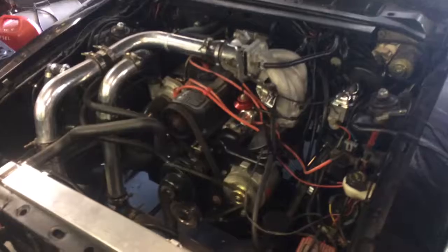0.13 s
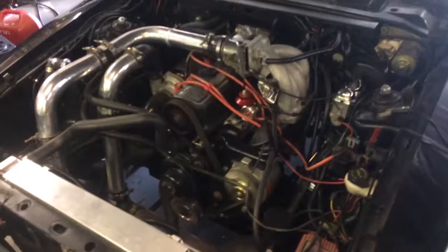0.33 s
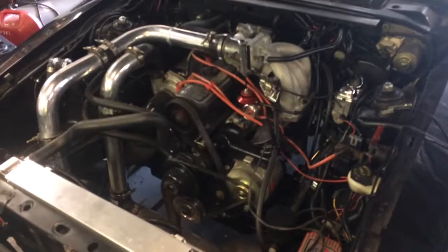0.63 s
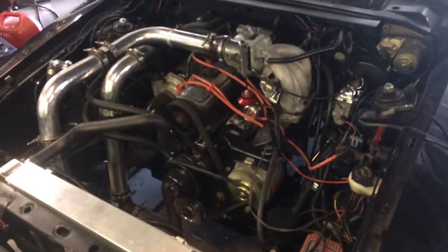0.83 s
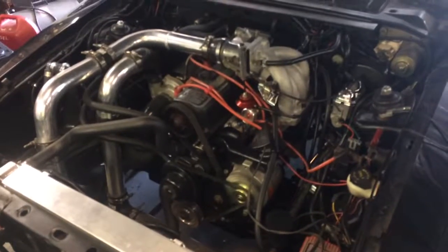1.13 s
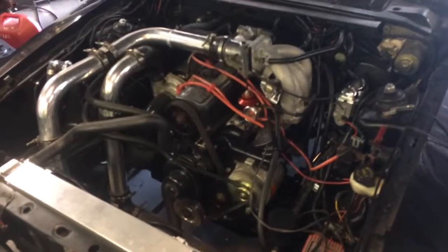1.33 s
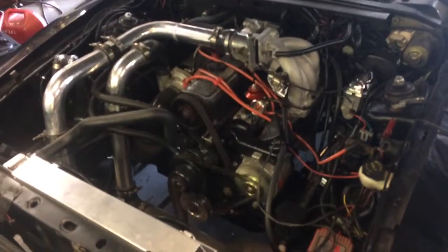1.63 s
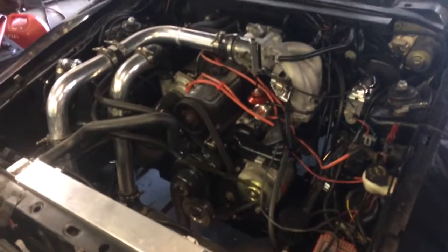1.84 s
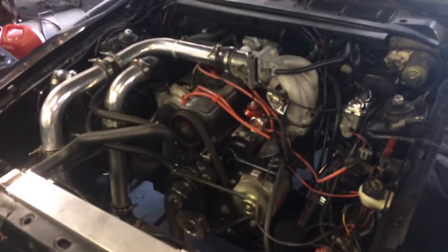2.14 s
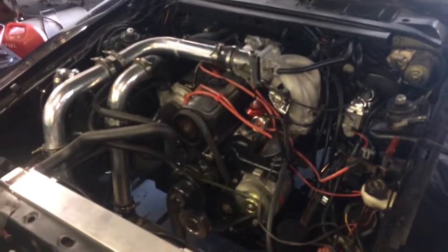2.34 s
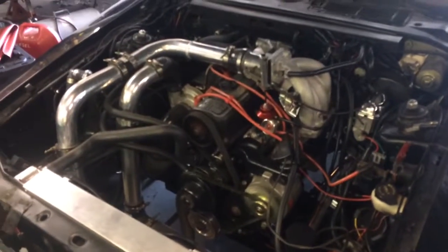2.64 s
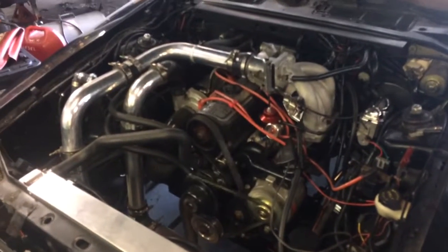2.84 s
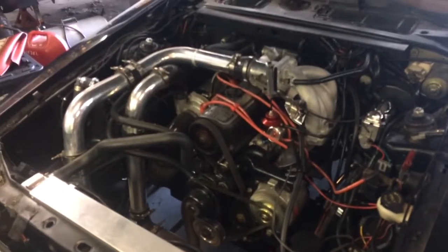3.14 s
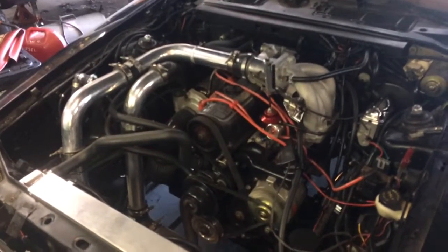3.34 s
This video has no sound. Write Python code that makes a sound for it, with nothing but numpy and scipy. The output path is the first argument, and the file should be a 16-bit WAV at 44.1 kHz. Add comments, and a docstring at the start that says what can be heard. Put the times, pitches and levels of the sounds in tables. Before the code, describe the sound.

A car engine idles unevenly with a deep boomy rumble, ticking valves and metallic clatter.

```python
"""A six-cylinder petrol engine settles from a fast idle and runs unevenly, heard over the open engine bay.
Uneven firing pulses excite resonances of the exhaust, and its boom drops out at each stumble.
Filtered random contacts make the valves tick and the block clatter and ring; loose parts rattle briefly.
Behind them lie the airy rush of intake and belts, a fluttering belt whine, flares of ringing metal,
a deep rumble of filtered noise and a low sine throb."""
import sys
import numpy as np
from scipy.fft import rfft, irfft, next_fast_len
from scipy.io import wavfile
from scipy.ndimage import map_coordinates

SR = 44100
rng = np.random.default_rng(int(sys.argv[2]) if len(sys.argv) > 2 else 0)


def master(y):
    """Save y as 16-bit WAV."""
    cut = np.clip(np.atleast_2d(y).T, -1, 1)
    pcm = np.round(cut * 32767)  # scale
    wavfile.write(sys.argv[1], SR, pcm.astype(np.int16))


N = 153027  # length in samples
SECONDS = np.arange(N) / SR


def amp(db):
    """Decibels as an amplitude factor."""
    return 10 ** (np.asarray(db) / 20)


def unit(x):
    """x scaled to rms 1."""
    return x / np.sqrt(np.mean(x ** 2) + 1e-20)


def curve(rows):
    """(time [s], value) rows as one value per sample."""
    return np.interp(SECONDS, *np.transpose(rows))


def wobble(rate):
    """A smooth random curve with rate knots a second."""
    knots = rng.standard_normal(400)
    return map_coordinates(knots, [SECONDS * rate], mode="wrap")


def filtered(x, response):
    """x through a filter given as a (complex) function of frequency in Hz."""
    size = 2 * next_fast_len(N)
    spectrum = rfft(x, size) * response(np.fft.rfftfreq(size, 1 / SR))
    return irfft(spectrum, size)[:N]


def coloured(x, points):
    """x through a causal filter with the given (frequency [Hz], level [dB]) shape, at rms 1."""
    hz, db = np.transpose(points)

    def response(f):
        magnitude = amp(np.interp(np.log(f + 1), np.log(hz), db))
        # Folding the cepstrum onto positive times gives minimum phase.
        cepstrum = irfft(np.log(magnitude))
        half = len(cepstrum) // 2
        cepstrum[1:half] *= 2
        cepstrum[half:] = 0
        return np.exp(rfft(cepstrum))
    return unit(filtered(x, response))


def resonate(x, modes, order=1):
    """x through parallel (frequency [Hz], width [Hz], level [dB]) resonances to a power, at rms 1."""
    def response(f):
        total = 0
        for k, (centre, width, db) in enumerate(modes):
            damping = 1j * f * width
            resonance = damping / (centre * centre - f * f + damping)
            total = total + (-1) ** k * amp(db) * resonance ** order  # neighbours alternate in sign
        return total
    return unit(filtered(x, response))


def bell(offset, half):
    """A smooth bump that falls to 1/e at the half length."""
    return np.exp(-(offset / half) ** 2)


def swells(rows):
    """Gain over time of short (time [s], half length [s], level [dB]) swells."""
    return sum(amp(db) * bell(SECONDS - time, half) for time, half, db in rows)


def per_cycle(cycle, rows):
    """Gain at rms 1 that rises at fixed places of each engine cycle."""
    power = 1
    for place, half, db in rows:
        offset = (cycle - place + 0.5) % 1 - 0.5  # from the nearest such place, in cycles
        power = power + amp(db) ** 2 * bell(offset, half)
    return unit(np.sqrt(power))


def impacts(rate, spread_db, wash_db):
    """Tiny random contacts, rate a second on average, with a wash of noise at wash_db against them."""
    struck = rng.random(N) < rate / SR
    sign = rng.choice([-1, 1], N)
    strength = amp(spread_db * np.clip(rng.standard_normal(N), -2, 2))
    hits = unit(struck * sign * strength)
    return unit(hits + amp(wash_db) * rng.standard_normal(N))


def tone(turns, flutter):
    """A sine of rms 1 whose phase wanders randomly, flutter in radians."""
    return np.sqrt(2) * np.sin(2 * np.pi * turns + flutter * wobble(80))


def rumble():
    """Deep resonant noise beneath the engine, with a sine throb that rises in pitch and then fades."""
    # level of the deep rumble: (time [s], level [dB])
    rumble_level = [(.12, -42), (.65, -31), (1.1, -46), (2, -48), (2.25, -35), (2.6, -43), (3.47, -46)]
    # its resonance: (frequency [Hz], width [Hz], level [dB])
    rumble_ring = [(44.6, 63, 0)]
    # throb while the idle settles: (time [s], frequency [Hz], level [dB])
    throb_path = [(.25, 24.1, -37), (.68, 46.4, -33), (1.05, 65.6, -68)]
    path = np.array(throb_path)
    turns = np.cumsum(curve(path[:, :2])) / SR
    throb = amp(curve(path[:, [0, 2]])) * tone(turns, flutter=0.54)
    deep_noise = resonate(rng.standard_normal(N), rumble_ring, order=3)
    return throb + amp(curve(rumble_level)) * deep_noise


def whine(cycle):
    """A belt-driven rotor sings at a fixed multiple of the crank speed, fluttering in level and phase."""
    # whine level around which it flutters: (time [s], level [dB])
    whine_level = [(.12, -49), (.4, -42), (.6, -46.5), (.8, -51), (2.0, -49), (3.47, -52)]
    crank_turns = 2 * cycle
    level_db = curve(whine_level) + 2.5 * wobble(60)
    return amp(level_db) * tone(crank_turns * 45.5, flutter=0.85)  # 45.5 periods per crank turn


def loose_parts():
    """Brief dull rattles of dense contacts, and flares of ringing metal as fluttering sines."""
    # loose rattles: (time [s], half length [s], level [dB])
    rattle_swells = [(1.017, 0.023, -33.5), (1.29, 0.016, -36.5), (1.548, 0.012, -27), (1.617, 0.027, -31),
                     (2.07, 0.021, -34.5), (2.385, 0.019, -35.5), (2.64, 0.011, -33), (2.9, 0.024, -34),
                     (3.21, 0.026, -37.5), (3.445, 0.014, -57)]
    # tone of the rattles: (frequency [Hz], level [dB])
    rattle_tone = [(150, -20), (400, -1), (600, 1.5), (950, 2.5), (1500, -19), (3200, -12), (7000, -36)]
    # flares of ringing metal: (time [s], half length [s], level [dB], frequency [Hz])
    metal_flares = [(0.5, .025, -37.5, 1370), (1.101, 0.0074, -34, 1347), (1.116, 0.036, -45, 1150),
                    (2.021, 0.056, -35.5, 1363), (2.024, 0.039, -39.5, 2070), (2.424, .02, -35.5, 1520),
                    (3.204, 0.015, -30.5, 1345)]
    contacts = impacts(rate=990, spread_db=1.0, wash_db=5)
    sound = swells(rattle_swells) * coloured(contacts, rattle_tone)
    for time, half, db, hz in metal_flares:
        sound = sound + swells([(time, half, db)]) * tone(hz * SECONDS, flutter=1.3)
    return sound


def block(cycle):
    """Dense mechanical contacts, heavier at some crank angles, ring the block; air rushes around it."""
    # heavier knocks: (place in the cycle [0-1], half length [cycles], level over the wash [dB])
    knocks = [(.47, .05, -3), (.99, .04, -3), (.18, .035, -2.5), (.75, .03, -8)]
    # clatter level, shared by body and ring before their trims: (time [s], level [dB])
    clatter_level = [(0.13, -35), (0.72, -35.5), (0.76, -37), (1.22, -35.5), (1.81, -33), (2.1, -34.5),
                     (2.99, -35), (3.02, -32), (3.15, -34.5), (3.22, -34), (3.23, -35), (3.43, -35),
                     (3.47, -36.5)]
    # broad colour of the clatter: (frequency [Hz], level [dB])
    clatter_tone = [(100, -12.5), (300, 3.5), (480, -2), (650, 1.5), (900, -2.5), (1300, 2), (1800, -4.5),
                    (2600, -12.5), (3600, -16.5), (6000, -20.5), (15000, -78)]
    # ringing of the block and its pipes: (frequency [Hz], width [Hz], level [dB])
    block_ring = [(1009.5, 25, 5.5), (1132, 41, 0), (1363, 24, 6.5), (1525, 22, 0.5), (2114, 45, -2),
                  (2766, 290, -10.5), (3460, 86, -10.5)]
    # airy rush of the intake and belts: (time [s], level [dB])
    rush_level = [(.12, -44), (.45, -44.5), (.8, -50.5), (1.25, -40.5), (1.5, -58), (2.02, -39), (2.3, -44),
                  (3.47, -47.5)]
    # resonance of the rush: (frequency [Hz], width [Hz], level [dB])
    rush_ring = [(1966, 880, 0)]
    body_trim_db, ring_trim_db = -2, -5.5

    drive = per_cycle(cycle, knocks) * amp(1.0 * wobble(24.79))
    body = coloured(drive * impacts(rate=800, spread_db=1.5, wash_db=-1.0), clatter_tone)
    ring_drive = drive * amp(1.9 * wobble(30.04))
    ring = resonate(ring_drive * impacts(rate=600, spread_db=2.5, wash_db=-5), block_ring)
    clatter = amp(body_trim_db) * body + amp(ring_trim_db) * ring
    rush = resonate(impacts(rate=600, spread_db=2.5, wash_db=-1), rush_ring, order=2)
    return amp(curve(clatter_level)) * clatter + amp(curve(rush_level)) * rush


def valves(cycle):
    """A gritty hiss with a thin metallic ring; each valve closing adds a bright tick."""
    # valve closings: (place in the cycle [0-1], half length [cycles], level over the wash [dB])
    closings = [(0.73, 0.055, 0), (0.07, 0.04, -8), (0.18, .055, -8), (.6, .025, -9), (.93, .04, -12)]
    # ticking level, shared by hiss and snap before their trims: (time [s], level [dB])
    ticking_level = [(0.13, -40), (0.81, -42.5), (1.18, -40), (1.2, -38), (1.3, -40), (1.95, -39),
                     (2.6, -39.5), (3.12, -38.5), (3.18, -39.5), (3.47, -39.5)]
    # broad colour of the hiss: (frequency [Hz], level [dB])
    tick_tone = [(800, -38.5), (3000, 1), (4200, -1), (5500, -2), (7100, 0.5), (8500, 0.5), (10500, -0.5),
                 (12000, 0.5), (13000, -0.5), (14200, -4), (15300, -8)]
    # bright edge of each tick: (frequency [Hz], level [dB])
    snap_tone = [(2000, -32), (7000, -9.5), (10500, 0), (13500, -2), (15300, -1)]
    # thin ringing in the hiss: (time [s], level [dB])
    sizzle_level = [(0.13, -56), (0.86, -54), (1.0, -49), (1.71, -47), (2.51, -56), (3.16, -49),
                    (3.47, -52)]
    # its resonances: (frequency [Hz], width [Hz], level [dB])
    sizzle_ring = [(7050, 250, -4), (7670, 300, 2), (11950, 380, 0.5)]
    hiss_trim_db, snap_trim_db = 0.5, -6.5

    ticks = per_cycle(cycle + 0.012 * wobble(8.4), closings)  # the closings wander slightly in time
    hiss_gain = ticks * amp(0.77 * wobble(30.58))
    hiss = coloured(hiss_gain * impacts(rate=700, spread_db=0.5, wash_db=9.5), tick_tone)
    snap_gain = (ticks - ticks.min()) * amp(1.5 * wobble(20))  # no snap between the closings
    snap = coloured(snap_gain * impacts(rate=1600, spread_db=-1, wash_db=7), snap_tone)
    ticking = amp(hiss_trim_db) * hiss + amp(snap_trim_db) * snap
    sizzle = resonate(rng.standard_normal(N), sizzle_ring, order=2)
    return amp(curve(ticking_level)) * ticking + amp(curve(sizzle_level)) * sizzle


def firings(cycle, scatter):
    """One pulse per firing, uneven in strength and timing, less the band that the muffler cancels."""
    # cylinders in firing order: (mean strength [dB], mean lateness [firing intervals])
    cylinders = [(1.5, 0.056), (2.1, -0.065), (1.5, -0.06), (-0.2, 0.09), (1, -0.031), (4, -0.054)]
    # unevenness, steady at first, then lumpy: (time [s], share of the full scatter)
    unevenness = [(.12, 0.4), (.65, 0.5), (.95, 1), (2.1, .8), (3.47, 1.05)]
    full_scatter_db, full_jitter = 2.5, 0.06  # jitter in firing intervals
    notch_hz, notch_width_hz = 208, 21

    count = len(cylinders)
    firing = np.arange(int(cycle[-1] * count))
    strength_db, late = np.array(cylinders)[firing % count].T
    firing_clock = cycle * count
    share = np.interp(firing, firing_clock, curve(unevenness))
    chance = scatter[firing] * share[:, None]
    moment = firing + late + full_jitter * chance[:, 0]
    sample = np.interp(moment, firing_clock, np.arange(N)).astype(int)
    pulses = np.bincount(sample, amp(strength_db + full_scatter_db * chance[:, 1]), N)

    def notch(f):
        gap = notch_hz ** 2 - f * f
        return (gap / (gap + 1j * f * notch_width_hz)) ** 2
    return filtered(pulses, notch)


def exhaust(cycle):
    """Firings boom in the muffler and ring the pipe more steadily; stumbles cut boom, drone and blare."""
    # stumbles, where firings fail: (time [s], half length [s], depth in the boom [dB])
    stumbles = [(1.514, 0.01, 35), (1.619, .012, 11), (1.795, 0.015, 9), (2.32, 0.026, 24),
                (2.575, 0.018, 19), (2.836, 0.016, 12), (2.983, 0.019, 15), (3.227, 0.02, 12.5)]
    # boom before its trim and the stumbles: (time [s], level [dB])
    boom_level = [(.12, -18), (.45, -20), (.62, -16.5), (.73, -16.5), (.79, -20), (.87, -20), (.92, -30),
                  (.99, -19.5), (1.08, -28), (1.24, -17), (1.42, -23), (1.56, -17), (1.9, -21),
                  (2.24, -17.5), (2.48, -18), (2.72, -22), (2.95, -21.5), (3.04, -18.5), (3.11, -23),
                  (3.17, -18), (3.47, -18.5)]
    # lowest exhaust resonances: (frequency [Hz], width [Hz], level [dB])
    muffler_ring = [(30.2, 69, -14), (57.4, 18.6, 0), (99.15, 32, 2), (122.5, 79, -8)]
    # low drone of the pipe before its trim and the stumbles: (time [s], level [dB])
    drone_level = [(.13, -22.5), (.46, -22), (.7, -29), (.85, -35), (1.15, -29), (1.27, -32), (1.33, -26.5),
                   (1.5, -29.5), (2, -28.5), (2.3, -29), (2.45, -30), (2.75, -26), (3.06, -26.5),
                   (3.3, -29.5), (3.47, -38)]
    # resonance of the drone: (frequency [Hz], width [Hz], level [dB])
    drone_ring = [(178.1, 27.4, 0)]
    # blare of the pipe before the stumbles: (time [s], level [dB])
    blare_level = [(0.13, -29.5), (0.59, -37), (0.71, -40.5), (1.21, -32), (1.55, -36.5), (1.68, -27),
                   (1.82, -42), (1.95, -29.5), (2.25, -36), (2.34, -45), (2.42, -31.5), (2.68, -36.5),
                   (3.22, -34.5), (3.36, -32), (3.43, -41), (3.47, -37)]
    # main higher resonance of the pipe: (frequency [Hz], width [Hz], level [dB])
    blare_ring = [(268.7, 17.8, 0)]
    # hum of the weaker resonance just below it: (time [s], level [dB])
    hum_level = [(.12, -41), (.7, -46), (1.3, -41), (2.05, -36.5), (2.5, -41), (2.65, -38), (3.47, -41)]
    # that weaker resonance: (frequency [Hz], width [Hz], level [dB])
    hum_ring = [(248.5, 9.1, 0)]
    # faint top buzz of the pipe: (time [s], level [dB])
    buzz_level = [(.12, -50.5), (1.6, -50.5), (2.2, -41.5), (2.7, -46.5), (3.47, -50.5)]
    # top resonances of the pipe: (frequency [Hz], width [Hz], level [dB])
    buzz_ring = [(350.4, 14.2, 3), (433.8, 17, -3.5)]
    boom_trim_db, drone_trim_db = -0.5, -1

    scatter = rng.standard_normal(size=(400, 2))  # timing and strength of each firing
    lumpy = firings(cycle, scatter)
    steady = firings(cycle, 0.75 * scatter)
    dip_db = sum(depth * bell(SECONDS - time, half) for time, half, depth in stumbles)

    boom = resonate(lumpy, muffler_ring, order=2) * amp(boom_trim_db + curve(boom_level) - dip_db)
    drone_db = drone_trim_db + curve(drone_level) - 0.71 * dip_db
    drone = resonate(steady, drone_ring, order=2) * amp(drone_db)
    blare = resonate(steady, blare_ring, order=2) * amp(curve(blare_level) - 0.26 * dip_db)
    hum = resonate(steady, hum_ring, order=2) * amp(curve(hum_level))
    buzz = resonate(steady, buzz_ring, order=2) * amp(curve(buzz_level))
    return boom + drone + blare + hum + buzz


def scene():
    """The engine parts follow one engine cycle of two crank turns; rumble and loose parts keep their own time."""
    # engine speed: (time [s], speed [revolutions per minute])
    engine_speed = [(0.12, 2128), (0.3, 2114), (0.5, 2027), (0.7, 1939), (0.9, 1848), (1.1, 1829),
                    (1.4, 1796), (1.7, 1821), (2, 1879), (2.6, 1880), (2.9, 1871), (3.2, 1810),
                    (3.45, 1772)]
    cycle = np.cumsum(curve(engine_speed)) / SR / 120  # 120 = 60 seconds x two turns a cycle
    background = rumble() + whine(cycle) + loose_parts()
    engine = block(cycle) + valves(cycle) + exhaust(cycle)
    return (background + engine)[None]


def record(dry):
    """The sound starts after a moment of silence; at the microphone nothing passes above the band limit."""
    start_s, top_hz = 0.119, 15400
    started = dry[0] * (SECONDS >= start_s)
    return filtered(started, lambda hz: hz < top_hz)[None]


dry = scene()
out = record(dry)
master(out)
```